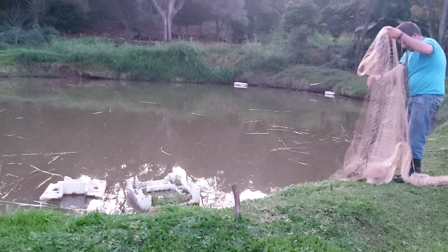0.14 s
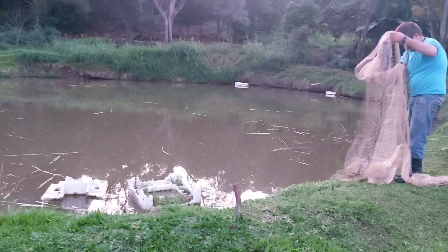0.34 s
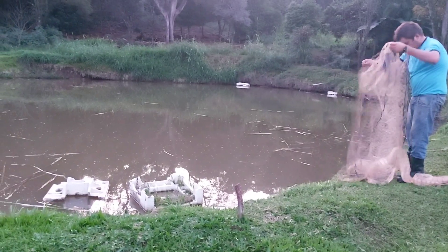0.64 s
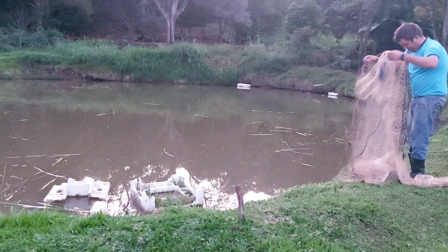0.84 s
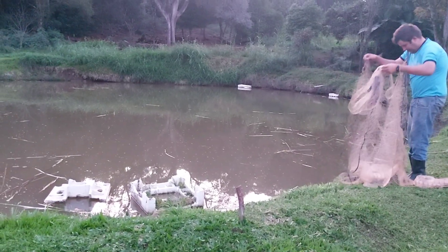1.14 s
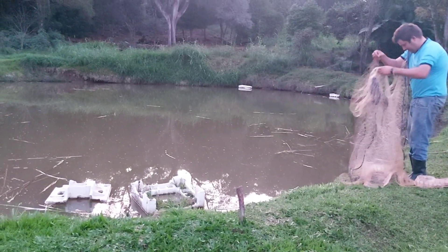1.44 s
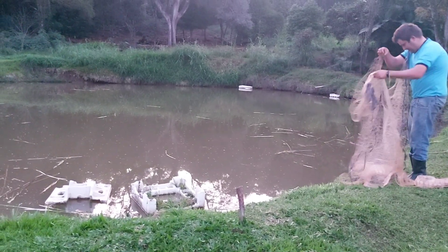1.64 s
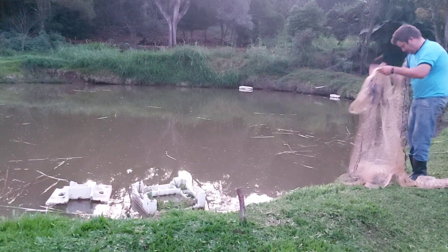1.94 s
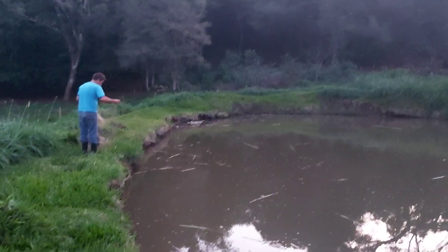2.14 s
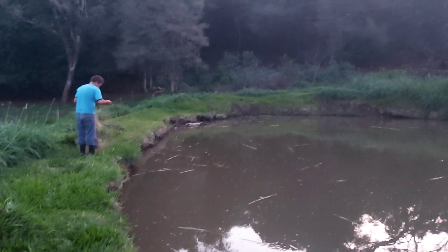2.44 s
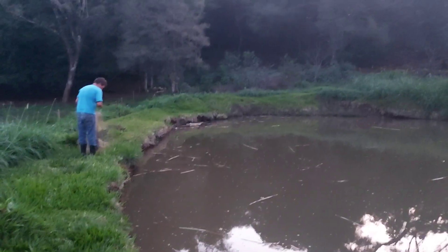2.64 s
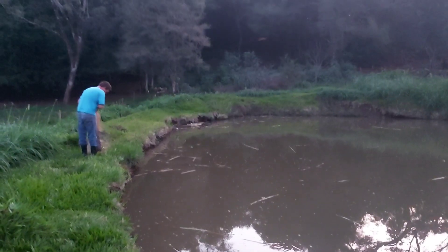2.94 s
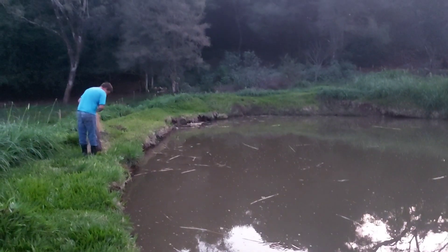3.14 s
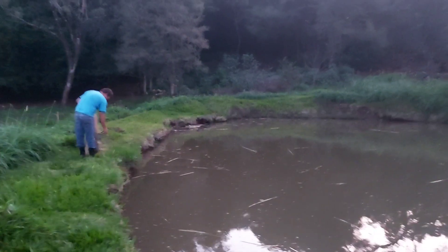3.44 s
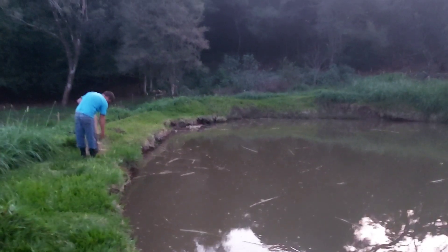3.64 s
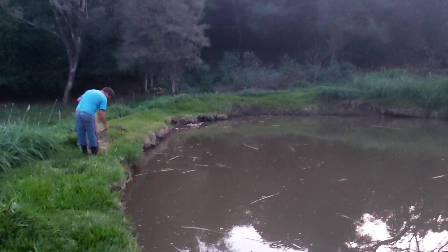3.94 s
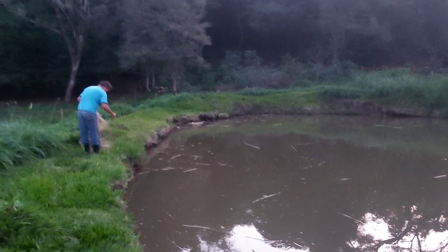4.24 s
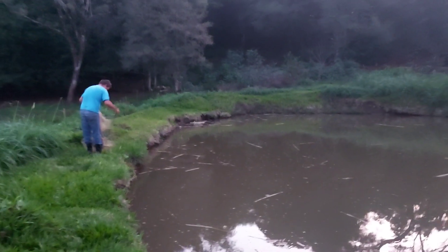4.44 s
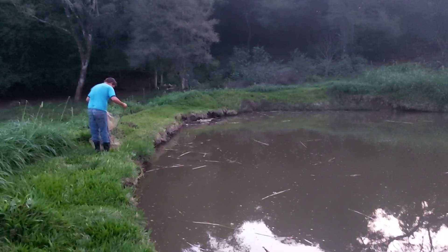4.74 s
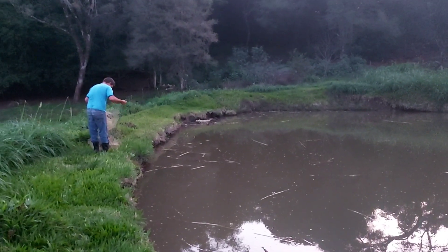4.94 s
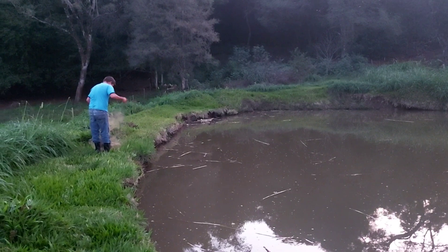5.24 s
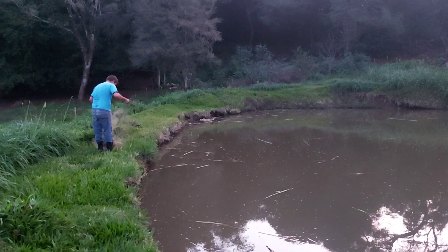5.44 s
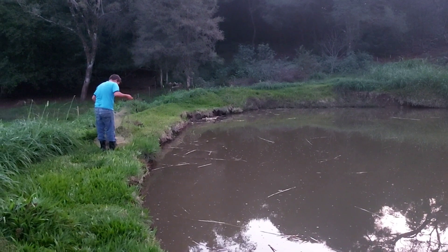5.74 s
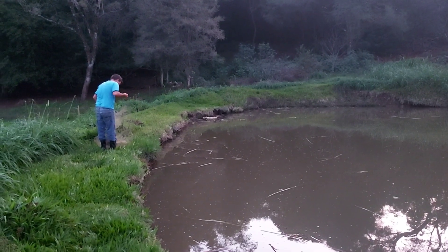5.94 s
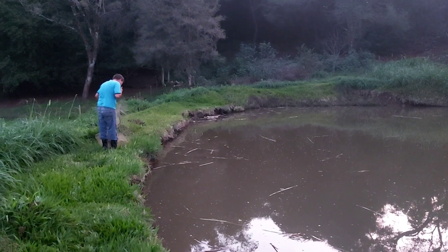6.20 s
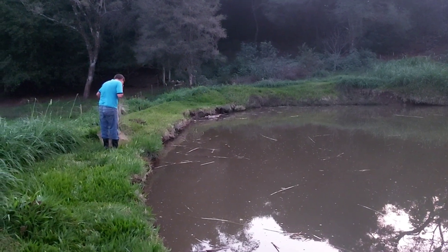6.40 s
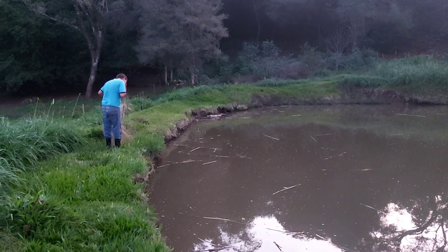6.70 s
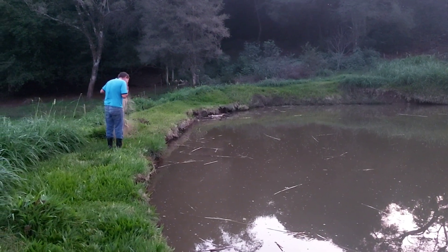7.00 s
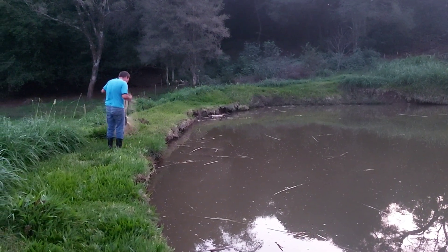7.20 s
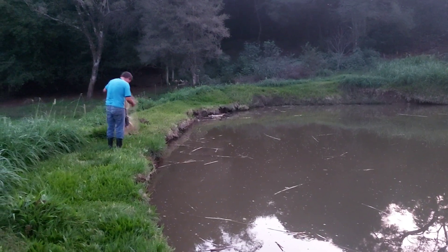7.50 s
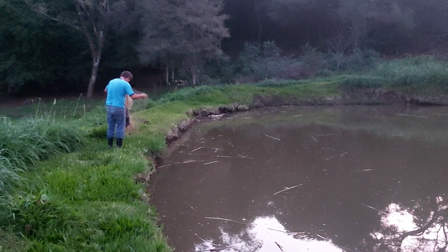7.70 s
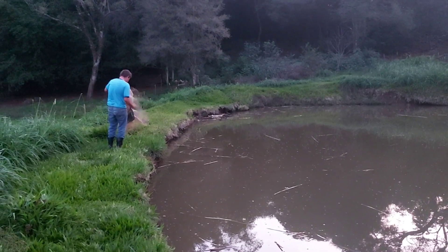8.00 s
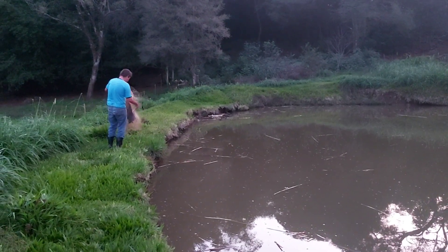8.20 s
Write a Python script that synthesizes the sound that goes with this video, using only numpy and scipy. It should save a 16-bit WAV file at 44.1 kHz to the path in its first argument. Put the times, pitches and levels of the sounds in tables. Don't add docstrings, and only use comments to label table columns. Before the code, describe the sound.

A low motor hum under busy whistling birds and shimmering insects by a pond, a brief silence, then fainter birds, net clicks and a late croak.

```python
import sys
import numpy as np
from scipy import signal
from scipy.fft import rfft, irfft, next_fast_len
from scipy.io import wavfile
from scipy.ndimage import map_coordinates

SR = 44100
rng = np.random.default_rng(int(sys.argv[2]) if len(sys.argv) > 2 else 0)


def volts_from_db(level):
    exponent = np.asarray(level, float) / 20
    return 10 ** exponent


def store_wav(level_fs):
    pcm = np.round(np.clip(np.atleast_2d(level_fs), -1, 1) * 32767)
    wavfile.write(sys.argv[1], SR, pcm.T.astype(np.int16))


N = 368676
TIME = np.arange(N) / SR
FIRST_END_S, SECOND_START_S, FADED_IN_S = 1.979, 2.386, 2.42
FIRST_SHOT = TIME < SECOND_START_S
HALF = np.array([[.5], [-.5]])


def unit(x):
    return x / np.sqrt(np.mean(x ** 2) + 1e-20)


def along(points, hz):
    f, v = np.transpose(points)
    return np.interp(np.log(hz + 1), np.log(f + 1), v)


def curves(shots):
    s, *columns = np.vstack(shots).T
    return [np.interp(TIME, s, column) for column in columns]


def per_shot(first, second):
    return np.where(FIRST_SHOT, first, second)


def wobble(rate):
    return map_coordinates(rng.standard_normal(int(N * rate / SR) + 4), [TIME * rate])


def filtered(x, response):
    m = next_fast_len(N + 8192)
    return irfft(rfft(x, m) * response(np.fft.rfftfreq(m, 1 / SR)), m)[..., :N]


def modes(table):
    def response(f):
        total = 0
        for k, (centre, width, db) in enumerate(table):
            total = total + (-1) ** k * volts_from_db(db) * 1j * f * width / (centre * centre - f * f + 1j * f * width)
        return total
    return response


def ring(x, table):
    return unit(filtered(x, lambda f: modes(table)(f) ** 2))


def ports(x, lag_ms):
    lag_s = lag_ms / 1000 * np.array([[0], [1]])
    return filtered(np.array([x, x]), lambda f: np.exp(-2j * np.pi * f * lag_s))


def spread(make, alike, lag_ms):
    share = np.clip(alike, 0, 1)
    common = np.sqrt(share) * ports(make(), lag_ms)
    return unit(common + np.sqrt(1 - share) * np.array([make(), make()]))


def noise(spectrum):
    return lambda: unit(filtered(rng.standard_normal(N), lambda f: volts_from_db(along(spectrum, f))))


def motor():
    shaft_hz = 69.02
    # (time [s], level [dB])
    hum_level = [
        [(0, -49), (1.96, -49)],
        [(2.4, -51), (2.55, -46), (8.36, -46)],
    ]
    # (multiple of the shaft [1], first shot level [dB], second shot level [dB])
    shaft_orders = [(1, 1.5, 0.5), (2, -20.5, -26.5), (3, -55.5, -66), (4, -20.5, -16), (5, -50, -35.5),
                    (6, -25.5, -35.5), (7, -34, -29.5), (8, -55, -38), (9, -57, -21.5), (10, -48, -23.5),
                    (10.74, -26, -39), (14, -55, -35), (17, -24.5, -30.5), (18, -32, -50)]
    db, low, high = curves(hum_level)[0], np.zeros(N), np.zeros(N)
    for k, near_db, far_db in shaft_orders:
        drift = 0.35 * np.sqrt(k) * wobble(6) + rng.uniform(0, 2 * np.pi)
        unsteady_db = (.5 if k == 1 else 1.6) * wobble(6.5)
        level = db + 5 + per_shot(near_db, far_db) + unsteady_db
        side = low if k < 6 else high
        side += volts_from_db(level) * np.sin(2 * np.pi * k * shaft_hz * TIME + drift)
    return low + ports(high, lag_ms=0.46)


def whistles(rows, rough_hz, flutter_db, flank_hz):
    knee_ms, steepen = 32, .3
    carry_hz = 3600
    out = np.zeros(N + 2 * SR)
    shake, flutter = rough_hz * wobble(250), volts_from_db(flutter_db * wobble(90))
    for s, rise, fall, hz, bend, db in rows:
        at = np.arange(max(round((s - rise) * SR), 0), min(round((s + fall) * SR), N))
        ms, height = 1000 * np.abs(TIME[at] - s), hz / carry_hz
        arch = hz - bend * ms ** 2 * (ms / knee_ms) ** steepen
        glide = np.maximum(arch + height * shake[at], 300)
        flank_db = (arch - hz) / (flank_hz * height ** 2.6)
        swell = np.sin(np.linspace(0, np.pi, len(at))) ** .5 * volts_from_db(flank_db)
        out[at] += volts_from_db(db) * swell * flutter[at] * np.sin(2 * np.pi * np.cumsum(glide) / SR)
    return out[:N]


def trees(x):
    # (frequency [Hz], time to fall 60 dB [s])
    tree_decay = [(1000, 0.058), (4000, 0.57), (10000, 0.025)]
    hz, t, z = signal.stft(rng.standard_normal((2, SR // 2)), SR, nperseg=256)
    fade = volts_from_db(-60 * t / along(tree_decay, hz)[:, None])
    tail = signal.istft(z * fade, SR, nperseg=256)[1]
    return signal.fftconvolve(x[None], tail / np.linalg.norm(tail[0]), axes=1)[:, :N]


def trunks(x):
    first_s, last_s, count = .006, .07, 7
    taps = np.zeros((2, SR // 10))
    for port in taps:
        at = (rng.uniform(first_s, last_s, size=count) * SR).astype(int)
        port[at] = rng.choice([-1, 1], size=count) / np.sqrt(count)
    return signal.fftconvolve(x[None], taps, axes=1)[:, :N]


def crowd(low_hz, high_hz):
    u = rng.random((600, 4))
    start = (np.arange(len(u)) + u[:, 0]) / len(u) * N / SR
    rise, fall = .02 + .02 * u[:, 1], .02 + .03 * u[:, 1]
    top_hz = low_hz + (high_hz - low_hz) * u[:, 2]
    rows = np.c_[start, rise, fall, top_hz, .4 + u[:, 3], -6 * u[:, 1]]
    far = whistles(rows, rough_hz=150, flutter_db=3, flank_hz=700)
    return unit(.4 * trees(far) + trunks(far) + .8 * ports(far, lag_ms=0.46))


def flock():
    # (time [s], level [dB])
    flock_level = [
        [(0, -49), (.05, -60), (.08, -77), (.15, -69), (.2, -60), (.55, -59.5), (.65, -65.5), (.75, -60),
         (1.4, -59), (1.65, -62), (1.96, -60.5)],
        [(2.44, -70.5), (2.58, -61.5), (2.68, -69), (2.9, -66.5), (3.3, -73), (3.7, -72), (3.9, -69),
         (4.3, -69), (4.83, -65.5), (5.75, -68), (5.95, -78), (6.08, -73), (6.3, -68.5), (6.57, -76),
         (6.85, -66), (7.08, -76.5), (7.25, -73), (7.62, -67), (7.8, -73.5), (7.95, -68), (8.15, -73.5),
         (8.3, -64.5)],
    ]
    db = curves(flock_level)[0]
    low = volts_from_db(db + per_shot(-8, 0.5)) * crowd(1750, 2900)
    return low + volts_from_db(db + per_shot(3, -1.5)) * crowd(2700, 4200)


def peeps():
    # (top time [s], top frequency [Hz], level [dB])
    peep_events = [(0.013, 3440, -50.5), (0.244, 3380, -49.5), (.503, 3420, -50.5), (.775, 3480, -61.5),
                   (.945, 3820, -51.5), (1.862, 3590, -60), (0.789, 3290, -63.5), (1.021, 3506, -51.5),
                   (1.37, 3090, -52), (1.511, 3355, -53.5), (1.975, 3520, -56.5), (2.571, 3400, -68),
                   (2.899, 3190, -68.5), (5.19, 3570, -69), (2.93, 3570, -70), (3.201, 3180, -70),
                   (3.473, 3505, -67.5), (4.465, 3390, -72), (4.81, 3470, -66.5), (5.791, 3320, -71),
                   (6.156, 3230, -75), (6.39, 3240, -73), (7.3, 3270, -68), (5.002, 2920, -71),
                   (6.85, 3580, -73), (7.619, 3120, -78), (7.926, 3390, -71), (8.29, 3300, -74.5)]
    rows = []
    for s, hz, db in peep_events:
        rise, fall, bend, low_db = (.03, .055, .55, -9) if s > SECOND_START_S else (.026, .05, 1, -22)
        for k in (1, 2):
            rows.append((s, rise, fall, hz / k, bend / k, db + (k - 1) * low_db))
    return np.array(rows)


def streaks():
    # (start time [s], start frequency [Hz], level [dB], length [s])
    streak_events = [(.258, 4650, -60, 0.014), (.526, 4650, -56, .012), (.796, 4100, -54, .012),
                     (1.3, 4700, -65.5, 0.016), (7.63, 4500, -73.5, 0.026), (7.94, 4600, -68, 0.022),
                     (.415, 3400, -52, .022), (0.26, 4200, -65, .016), (1.43, 1900, -51.5, .022),
                     (5.51, 1500, -81, 0.041), (2.585, 3500, -68, 0.037), (.7, 4300, -58, .01),
                     (0.92, 3250, -51, 0.013)]
    bend = 1.8
    return [(s, 0, length, hz, bend, db) for s, hz, db, length in streak_events]


def arches(soft):
    soft_hz = 1870
    # (top time [s], top frequency [Hz], level [dB], length [s])
    near_calls = [
        (0.386, 1935, -65, 0.075),
        (0.775, 1720, -70, 0.063),
        (0.907, 2057, -62, 0.07),
        (1.257, 1845, -64.5, .065),
        (1.327, 1780, -68, 0.068),
        (1.404, 2067, -64.5, 0.092),
        (1.758, 1995, -63.5, 0.11),
    ]
    # (top time [s], top frequency [Hz], level [dB], length [s])
    far_calls = [(2.442, 1967, -67.5, 0.11), (2.751, 1810, -69.5, 0.087), (2.9, 1920, -69.5, 0.065),
                 (3.078, 1724, -69, 0.068), (3.376, 1752, -71, 0.078), (3.773, 1950, -63, 0.098),
                 (3.854, 1825, -69, 0.1), (4.138, 1908, -64, 0.077), (4.193, 1734, -66.5, 0.11),
                 (4.519, 1740, -66, 0.088), (4.639, 1957, -62.5, 0.092), (4.855, 1870, -66, .06),
                 (5.121, 1862, -68.5, 0.0525), (5.232, 1942, -61, 0.086), (5.384, 1826, -64.5, 0.076),
                 (5.489, 1670, -72, 0.052), (5.629, 1940, -66, 0.081), (5.755, 1746, -68, 0.054),
                 (6.256, 1980, -63.5, 0.099), (6.515, 1770, -69.5, 0.075), (6.73, 2007, -60.5, 0.11),
                 (6.844, 1750, -70, 0.048), (7.18, 1780, -70, 0.065), (7.208, 2010, -61, 0.11),
                 (7.468, 1837, -67.5, .06)]
    climb_share = ((.36, .33), (.5, .3))
    sag = ((.19, .2), (.11, .09))
    octave_db = ((8, 7), (-1, -3))
    overtone_db = (-19.5, -26)
    rows = []
    for calls, shares, bends, octaves, over_db in zip((near_calls, far_calls), climb_share, sag,
                                                      octave_db, overtone_db):
        share, bend = shares[soft], bends[soft]
        partials_db = (0, octaves[soft], over_db, over_db, over_db)
        for s, hz, db, length in calls:
            if (hz < soft_hz) != soft:
                continue
            for k, step_db in enumerate(partials_db, 1):
                rows.append((s, share * length, (1 - share) * length, k * hz, k * bend, db + step_db))
    return rows


def pipes():
    # (middle time [s], frequency [Hz], level [dB], length [s])
    pipe_events = [(.12, 3500, -67.5, 0.11), (.21, 1880, -68, 0.062), (0.256, 2605, -65, 0.038),
                   (.33, 3490, -59, .07), (0.401, 2267, -70.5, .14), (.53, 2260, -77, .08),
                   (1.845, 1880, -66.5, .07), (.72, 2220, -75, .03), (.875, 1795, -69, .03),
                   (.93, 1750, -70, .05), (0.578, 4000, -65, .04), (1.246, 2610, -59, 0.023),
                   (1.328, 2300, -67, 0.1), (1.43, 2200, -63, 0.12), (1.935, 2420, -71, 0.098),
                   (1.971, 1897, -64.5, .04), (1.02, 1767, -70, .05), (2.703, 2034, -73.5, 0.08),
                   (3.913, 2064, -62, 0.012), (3.975, 1970, -64.5, .015), (4.398, 1970, -70, 0.059),
                   (5.005, 2826, -72.5, 0.12), (5.03, 4020, -75, .06), (5.6, 2840, -75, .06),
                   (5.71, 2010, -68, 0.03), (6.03, 2100, -79, .07), (5.905, 1595, -66, .015),
                   (7.03, 2250, -73, .015), (7.51, 2050, -67, .03), (7.94, 1940, -65, .025),
                   (2.52, 1990, -65, .025), (4.55, 2050, -78, .015), (6.655, 2216, -70.5, 0.062)]
    bend = .025
    return [(s, length / 2, length / 2, hz, bend, db) for s, hz, db, length in pipe_events]


def bird_aside():
    # (top time [s], rise [s], fall [s], top frequency [Hz], level [dB])
    aside_events = [(.194, 0.015, 0.037, 3380, -42.5), (0.379, .04, 0.036, 3370, -41),
                    (.568, 0.03, 0.043, 3350, -44.5), (0.754, 0.043, 0.028, 3260, -45),
                    (0.923, .02, 0.047, 3300, -43), (1.075, 0.018, 0.029, 3120, -46),
                    (1.218, 0.036, 0.041, 3150, -49.5), (1.34, .016, .02, 3000, -52),
                    (1.454, .016, 0.018, 3000, -47), (1.55, .012, .012, 2820, -50),
                    (1.66, .02, 0.018, 2850, -53.5), (.01, .012, 0.015, 3500, -43)]
    bend, lean_db = .4, -2.5
    rows = [(s, rise, fall, hz, bend, db) for s, rise, fall, hz, db in aside_events]
    aside = whistles(rows, 50, 2.5, flank_hz=200)
    return volts_from_db(lean_db * HALF) * ports(aside, lag_ms=.455) + volts_from_db(-10.5) * trunks(aside)


def birds():
    # (frequency [Hz], left over right [dB])
    near_lean = [(1800, 1), (2300, 5), (3000, 0), (3900, 3)]
    # (frequency [Hz], left over right [dB])
    far_lean = [(1900, 6.5), (2800, -2), (3400, -8), (4000, -4)]
    # (frequency [Hz], lead of the left port [cycles])
    near_turn = [(2000, 0), (2900, .38), (3150, .6), (3300, .77), (4100, .77)]
    # (frequency [Hz], lead of the left port [cycles])
    far_turn = [(1780, .3), (2010, .06), (2700, .2), (3450, .16), (3900, -.2), (4100, -.28)]
    # (frequency [Hz], level [dB])
    voice_tone = [(1900, -0.5), (2800, 5), (3400, 4), (3900, 5.5)]
    out = flock()
    clear = arches(soft=False) + pipes()
    soft = arches(soft=True)
    steep = np.vstack([peeps(), streaks()])
    near_smooth = whistles(clear, 35, 2, flank_hz=300) + whistles(soft, 45, 2.5, flank_hz=300)
    near_thin = volts_from_db(-4) * whistles(steep, 70, 3, flank_hz=250)
    far_smooth = whistles(clear, 55, 2.5, flank_hz=95) + whistles(soft, 100, 3.5, flank_hz=100)
    far_thin = volts_from_db(-2) * whistles(steep, 90, 5, flank_hz=700)
    for smooth, thin, shot, lean, turn, echo_db in (
            (near_smooth, near_thin, FIRST_SHOT, near_lean, near_turn, -7),
            (far_smooth, far_thin, ~FIRST_SHOT, far_lean, far_turn, -5)):
        direct = filtered((smooth + thin) * shot, lambda f: np.exp(2j * np.pi * along(turn, f) * HALF))
        wet = volts_from_db(4.5) * direct + volts_from_db(-6.5) * trees(smooth * shot)
        wet += volts_from_db(4.5 + echo_db) * trunks((thin + .3 * smooth) * shot)
        out += filtered(wet, lambda f: volts_from_db(along(voice_tone, f) + along(lean, f) * HALF))
    return out + bird_aside()


def chorus():
    # (time [s], level [dB], upper singers over it [dB])
    chorus_level = [
        [(0, -66.5, -8.5), (1.96, -74.5, -7.5)],
        [(2.44, -64.5, -6.5), (5, -65.5, -5), (8.36, -66.5, -2)],
    ]
    # (frequency [Hz], width [Hz], level [dB])
    main_wings = [(4660, 460, 8.5), (5400, 650, 3.5)]
    # (frequency [Hz], width [Hz], level [dB])
    upper_wings = [(5900, 450, 0)]
    db, upper_db = curves(chorus_level)
    pulse = np.sin(2 * np.pi * np.cumsum(71 + 4 * wobble(10)) / SR)
    beat = volts_from_db(3.4 * pulse + 1.4 * wobble(30) + 0.23 * wobble(2.1))

    def sing(wings):
        clicks = rng.standard_normal(N) * (rng.random(N) < .08) * beat
        return ring(clicks, wings)

    main = volts_from_db(db + 5.5) * spread(lambda: sing(main_wings), alike=0.58, lag_ms=0.319)
    return main + volts_from_db(db + upper_db + 2.5) * spread(lambda: sing(upper_wings), alike=1.0, lag_ms=0.3)


def air():
    # (frequency [Hz], density [dB per Hz])
    thud_tone = [(25, -23), (50, -0.5), (100, -1), (140, -2.5), (190, -16.5), (260, -45), (400, -120)]
    # (frequency [Hz], density [dB per Hz])
    murmur_tone = [(100, -120), (200, -4.5), (310, 1), (480, -6.5), (700, -12), (1100, -22), (1600, -120)]
    # (frequency [Hz], density [dB per Hz])
    hiss_tone = [(500, -41), (700, -8.5), (900, -19), (1320, -17.5), (2000, -24), (3100, -35), (4100, -14),
                 (5170, -5), (6360, -19.5), (7330, -24), (9500, -27), (11500, -25), (14000, -28.5),
                 (15600, -32)]
    thud = volts_from_db(-58 + 0.5 * wobble(12)) * spread(noise(thud_tone), alike=0.8, lag_ms=0)
    murmur = volts_from_db(-63.5 + 2.9 * wobble(10)) * spread(noise(murmur_tone), alike=0.58, lag_ms=0.21)
    grain_db = .5 * wobble(10) + 1.2 * wobble(150)
    grain_db -= 4 * np.exp(-np.abs(TIME - SECOND_START_S) / 0.29)
    hiss = volts_from_db(per_shot(-60, -61) + grain_db) * spread(noise(hiss_tone), alike=0.17, lag_ms=0.4365)
    return thud + murmur + hiss


def net():
    # (time [s], peak level [dB])
    tick_events = [(0.058, -54.5), (0.537, -51), (0.6646, -55), (1.55, -55.5), (3.132, -57), (3.207, -55),
                   (3.321, -58), (3.4161, -63), (3.9474, -59), (4.068, -55), (5.1956, -55), (5.306, -47.5),
                   (5.321, -41), (5.339, -42.5), (5.351, -50), (5.5784, -41), (5.581, -51), (5.5904, -50),
                   (5.595, -44.5), (5.6082, -59), (7.689, -57), (7.7058, -49.5), (7.893, -53),
                   (7.9404, -47.5), (8.1842, -52)]
    # (time [s], length [s], centre frequency [Hz], width [Hz], level [dB])
    rustle_events = [(3.4, 0.09, 6700, 1300, -54), (3.4, .08, 5300, 600, -57.5),
                     (3.38, .18, 7000, 6000, -62.5), (3.595, .035, 2000, 800, -66),
                     (7.56, .035, 2300, 500, -67), (7.685, .045, 2100, 500, -65),
                     (2.84, .035, 2350, 400, -66), (3.373, .007, 9200, 2000, -63),
                     (5.568, 0.045, 7000, 11000, -59), (0, .06, 3500, 1400, -58),
                     (6.83, 0.1, 1400, 1600, -60.5), (3.21, 0.04, 1200, 470, -61.5),
                     (6.64, 0.061, 2400, 1300, -62), (6.38, .04, 200, 200, -59),
                     (0.37, 0.05, 13400, 700, -70), (7.86, .11, 2000, 700, -65), (6.82, .3, 400, 200, -65),
                     (.12, 0.29, 304, 63, -60.5), (1.47, .4, 304, 70, -58), (4.45, 0.36, 97, 66, -51),
                     (2.6, 0.16, 120, 150, -53), (4.72, 0.36, 440, 180, -67)]
    out, t = np.zeros((2, N + SR)), np.arange(SR // 50) / SR
    for s, db in tick_events:
        decay = volts_from_db(db + 1.0 - 60 * t / 0.029)
        out[:, round(s * SR):][:, :len(t)] += rng.standard_normal((2, len(t))) * decay
    out = filtered(out[:, :N], modes([(7200, 1200, 3), (13550, 2400, -3)])) * volts_from_db([[0], [-1]])

    def grains():
        return rng.standard_normal(N) * volts_from_db(2.2 * wobble(300))

    for s, length, hz, width, db in rustle_events:
        swell = np.sin(np.pi * np.clip((TIME - s) / length, 0, 1) ** 0.62)
        pair = spread(grains, alike=300 / hz, lag_ms=0)
        out += volts_from_db(db) * swell * ring(pair, [(hz, width, 0)])
    return out


def crickets():
    # (frequency [Hz], level [dB])
    trill_lines = [(6293, -76.5), (6368, -80), (6444, -80.5), (6600, -76)]
    # (first pulse [s], end [s], pulse rate [1/s], frequency [Hz], level [dB])
    buzz_bursts = [
        (.008, .2, 28.2, 14300, -86),
        (1.283, 1.96, 28.2, 14300, -85),
        (3.744, 4.36, 28.32, 14200, -78),
        (5.254, 6.06, 28.24, 14200, -78),
        (6.908, 7.74, 28.38, 14200, -77),
    ]
    trill, buzz = np.zeros(N), np.zeros(N)
    for hz, db in trill_lines:
        level = volts_from_db(db + 4 + 1.5 * wobble(3))
        trill += level * np.sin(2 * np.pi * hz * TIME + .4 * wobble(8))
    for s, end, rate, hz, db in buzz_bursts:
        pulse = np.clip(np.cos(2 * np.pi * rate * (TIME - s)) * 1.4 - .2, 0, 1)
        pulse = pulse * (TIME > s - .01) * (TIME < end)
        level = volts_from_db(db + 0.91 * wobble(37))
        turn = 2 * np.pi * np.cumsum(hz + 45 * wobble(30)) / SR / 3
        buzz += level * pulse * (np.sin(turn) + .6 * np.sin(2 * turn) + 1.5 * np.sin(3 * turn))
    steady = ports(trill * (TIME > SECOND_START_S), lag_ms=0.2)
    return steady + ports(buzz, lag_ms=0.058) * volts_from_db([[3], [-3]])


def croak():
    start_s, length_s, bursts_per_s = 8.045, 0.19, 45
    # (frequency [Hz], width [Hz], level [dB])
    throat_modes = [(2050, 390, -4), (2730, 99, -1)]
    swell = np.sin(np.pi * np.clip((TIME - start_s) / length_s, 0, 1)) ** 0.35
    bursts = volts_from_db(2.6 * np.sin(2 * np.pi * bursts_per_s * TIME)) * rng.standard_normal(N)
    voice = swell * ring(bursts, throat_modes)
    return volts_from_db(-62) * (ports(voice, lag_ms=0.43) + volts_from_db(-7) * trunks(voice))


def scene():
    return motor() + birds() + chorus() + air() + net() + crickets() + croak()


def roll_off(x):
    return signal.sosfilt(signal.butter(12, 15720, fs=SR, output="sos"), x)


def record(dry):
    # (frequency [Hz], left over right [dB])
    port_balance = [(300, .5), (700, 5.5), (1290, 8), (2380, 5.5), (4400, 1), (8120, 1.5), (11000, 2),
                    (15000, 7)]
    top_hz = 15720
    tilted = filtered(dry, lambda f: (f < top_hz) * volts_from_db(along(port_balance, f) * HALF))
    fade_in = np.clip((TIME - SECOND_START_S) / (FADED_IN_S - SECOND_START_S), 0, 1)
    gate = (TIME < FIRST_END_S) + fade_in
    mix = tilted * gate + volts_from_db(-104) * rng.standard_normal(N)
    return roll_off(mix)


dry = scene()
out = record(dry)
store_wav(out)
```